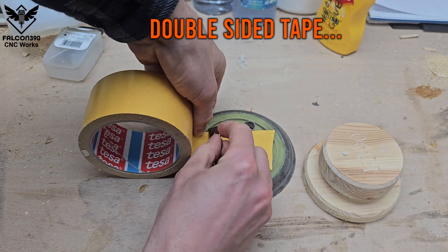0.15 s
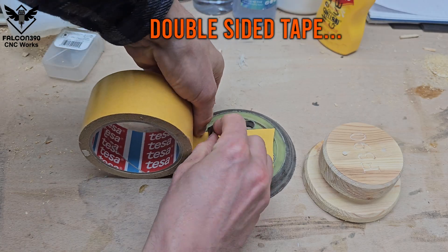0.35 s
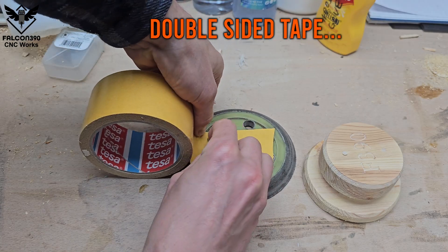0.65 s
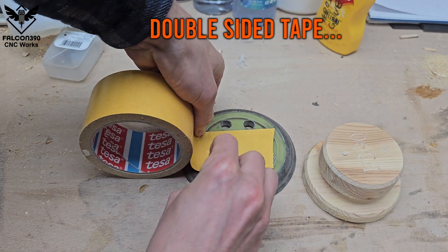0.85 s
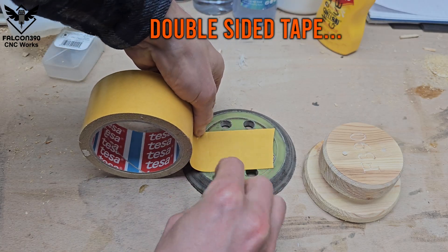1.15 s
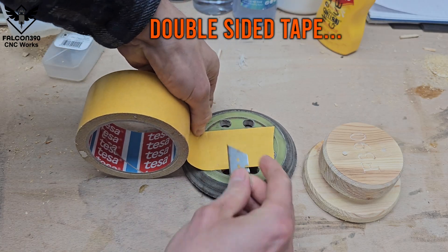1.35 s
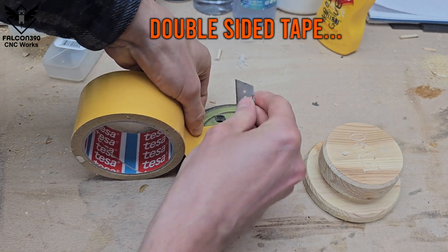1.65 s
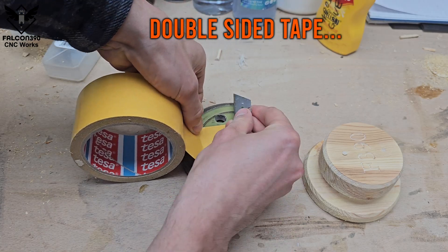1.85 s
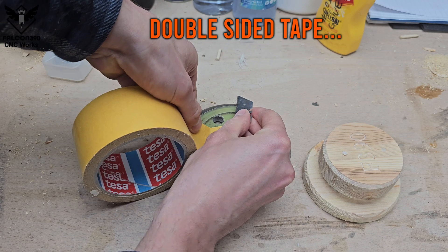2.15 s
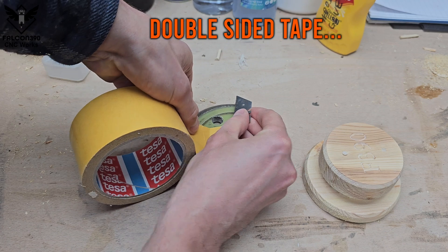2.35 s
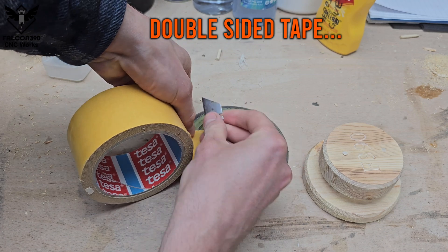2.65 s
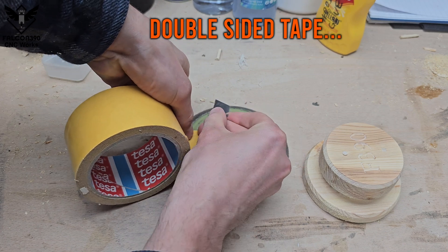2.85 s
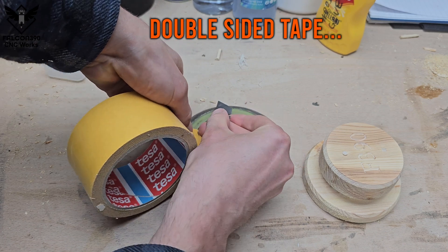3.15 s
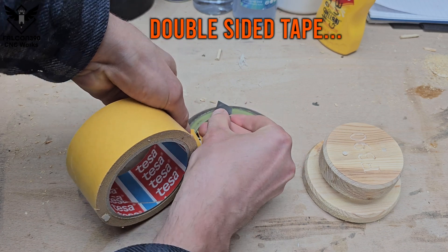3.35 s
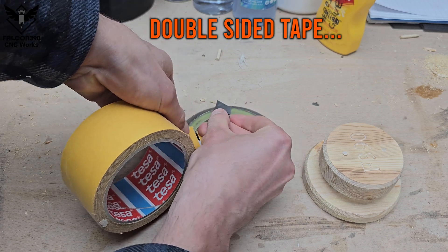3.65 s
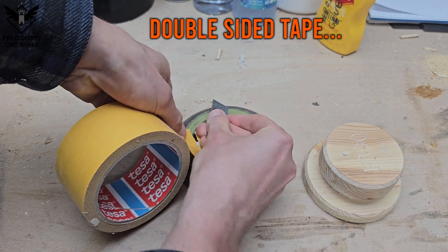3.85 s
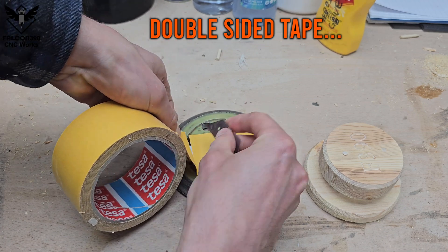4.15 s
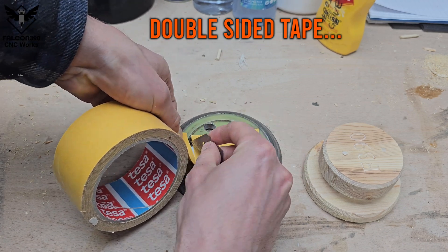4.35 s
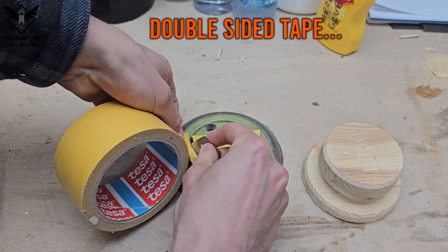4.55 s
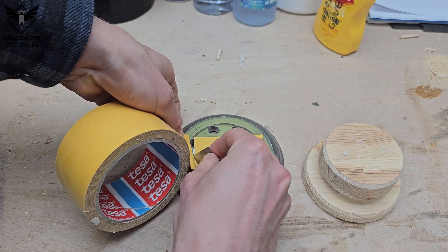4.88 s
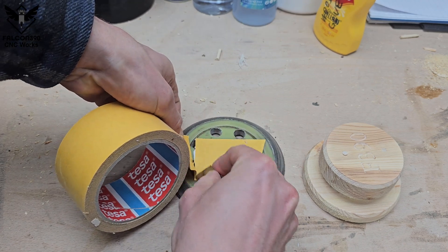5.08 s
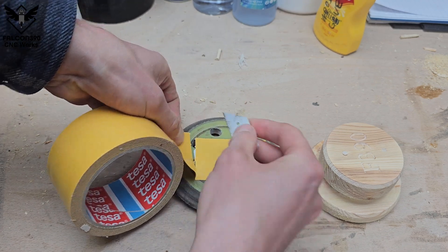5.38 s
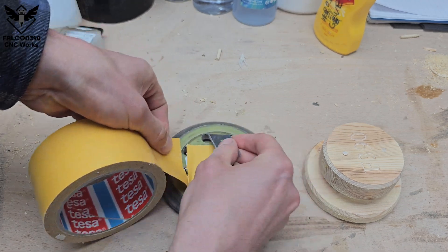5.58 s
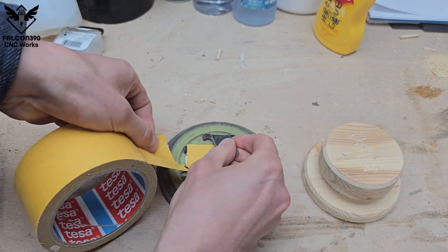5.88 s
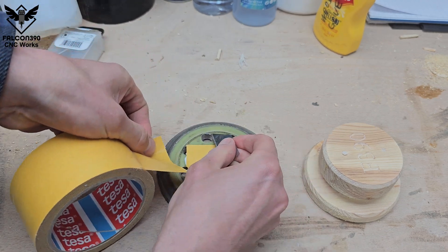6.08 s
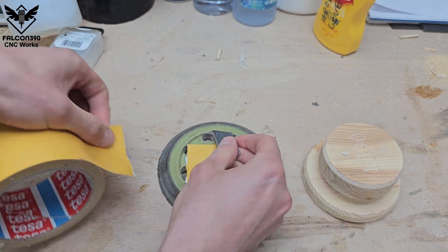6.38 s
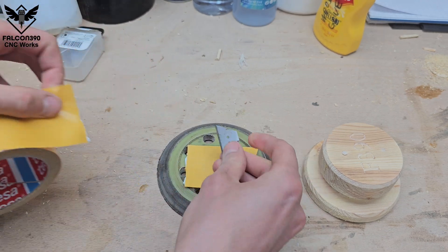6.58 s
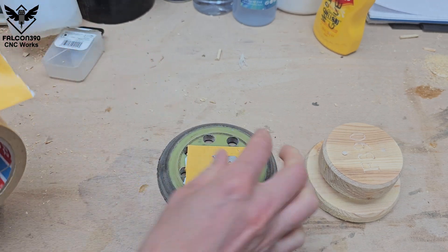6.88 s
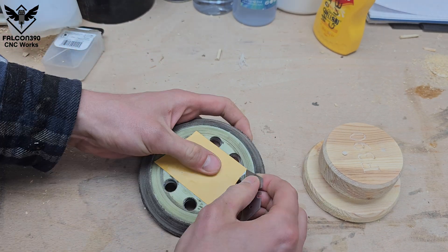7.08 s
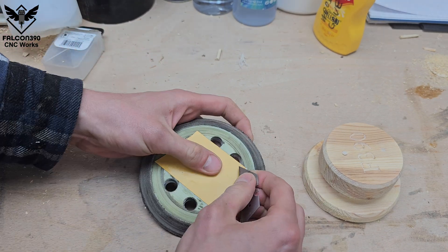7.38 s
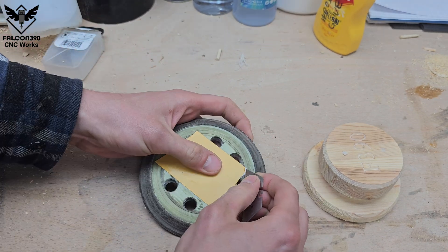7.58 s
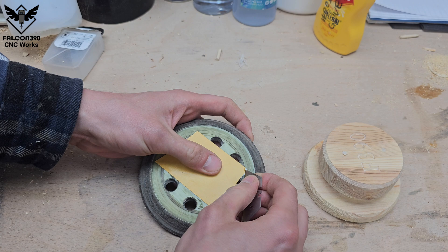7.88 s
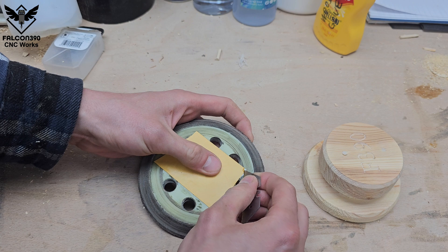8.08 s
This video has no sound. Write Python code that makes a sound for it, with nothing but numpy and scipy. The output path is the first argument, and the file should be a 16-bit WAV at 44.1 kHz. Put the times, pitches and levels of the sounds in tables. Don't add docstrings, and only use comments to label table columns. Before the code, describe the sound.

Sticky tape crackles and rips off its roll in irregular bursts, with sharp snaps, bench knocks and plastic scrapes, then near silence in a quiet workshop.

```python
import sys
import numpy as np
from scipy import signal
from scipy.io import wavfile
from scipy.ndimage import uniform_filter1d

SR = 44100
rng = np.random.default_rng(int(sys.argv[2]) if len(sys.argv) > 2 else 0)


def natural_amplitude(level_db):
    exponent = np.asarray(level_db, float) / 20
    return 10 ** exponent


def bounce(signal):
    frames = np.transpose(np.atleast_2d(signal))
    limited = np.clip(frames, -1, 1)
    pcm = np.round(limited * 32767).astype(np.int16)
    wavfile.write(sys.argv[1], SR, pcm)


N = 362943

# [start t/s, length t/s, crackle level/dB,
# fizz over crackle level/dB, tautness/dB]
HELD_PULLS = [(0.272, 0.0914, -38.5, -9, 0), (0.836, 0.1497, -38.5, -6, -1.5),
              (1.077, 0.1596, -37, -13, 4), (1.502, 0.0887, -39, -7, -4.5), (1.657, 0.118, -37, -9.5, -6),
              (1.886, 0.178, -38, -1, -1.5), (2.527, 0.0755, -42, -0.5, 0), (2.869, 0.0876, -39.5, -5, 2),
              (3.518, 0.052, -43, 0.5, -4.5), (3.575, 0.2085, -41, -3.5, -0.5),
              (3.9, 0.11, -32.5, -5.5, 0), (4.044, 0.1196, -44.5, -8, -1),
              (4.832, 0.07, -43.5, -3.5, -0.5), (4.901, 0.137, -35, -7, 1), (5.049, 0.1714, -35, -7, -1),
              (5.672, 0.068, -46.5, 6.5, -10),
              (.47, 0.1506, -44, -8, -0.5), (.62, 0.1535, -50, -4.5, -6), (1, 0.114, -47, -13, -3),
                  (1.33, 0.2, -50.5, -7, -3), (2.252, 0.058, -51, 5, -19.5), (2.66, 0.22, -63.5, -12, 1),
                  (3.107, 0.012, -44, -8, 2.5), (3.32, 0.149, -58, 1.5, 1.5),
                  (4.2, 0.1225, -53.5, -13.5, -1.5), (4.34, 0.171, -50.5, -23, -0.5),
                  (6.316, 0.102, -49, -6.5, 2), (6.63, 0.0656, -54.5, -2, 4.5),
                  (6.96, 0.067, -66, -4, 12.5)]
# [t/s, crackle level/dB, fizz over crackle level/dB, 20 dB fall t/s]
GLUE_JERKS = [(0, -44, -5.5, 0.0075), (2.019, -30, -15.5, 0.2208), (2.055, -28.5, -8, 0.1251),
              (2.43, -50.5, -12.5, 1.04), (3.93, -23.5, -4, 0.0028), (4.002, -29.5, -10.5, 0.0012),
              (5.541, -31.5, -11.5, 0.0956), (5.603, -34, -6, 0.1312), (5.655, -28.5, -9, 0.0674),
              (5.893, -23, -6.5, 0.0436), (5.957, -21, -6, 0.0467), (6.307, -44.5, -7, 0.0934),
              (6.857, -37.5, -13, 0.0749), (6.932, -43, -22.5, 0.086), (7.966, -71.5, -5.5, 0.37)]
# [t/s, crackle level/dB, fizz over crackle level/dB, 20 dB fall t/s]
SWELLING_TUGS = [(.126, -45.5, -7, 0.0777), (0.918, -32.5, -18, 0.0333), (1.235, -29.5, -21, 0.0207),
                 (1.822, -29, -16, 0.065), (4.494, -46.5, -11, 0.109), (4.797, -32.5, -9, 0.0465),
                 (5.338, -57.5, -6, 0.079), (5.462, -41, -12.5, 0.0586), (5.807, -36, -3, 0.0755),
                 (5.86, -49, 5.5, 0.18), (6.157, -51.5, -8.5, 0.139), (6.584, -38, -4, 0.0538),
                 (7.341, -61.5, -2, 0.0769)]
# [f/Hz, level per Hz/dB]
PAD_COLOUR = [(950, -16), (1400, -15), (1650, -9), (1900, -2), (2200, -6), (2650, -5), (3100, -11),
              (3700, -13)]
# [f/Hz, level per Hz/dB]
FILM_COLOUR = [(2900, -14), (3350, -3), (3800, -4), (4300, -1), (5000, -1), (5600, -5), (6600, -13)]
# [f/Hz, level per Hz/dB]
FIZZ_COLOUR = [(2940, -33), (5000, -7.5), (6420, -12.5), (7920, -10.5), (15000, -27.5), (16000, -28.5),
               (16500, -50.5)]
# [t/s, peak level/dB, ring f/Hz, top level/dB]
BRIGHT_SNAPS = [(0.5829, -17.5, 1933, -5), (0.9135, -17.5, 1850, -16.5), (1.4518, -23.5, 1959, -12),
                (1.493, -24.5, 2000, -7.5), (1.7763, -14, 1983, -26.5), (2.0129, 6.5, 1945, -15.5),
                (2.1034, -15, 2000, 2), (2.4227, -25.5, 2580, -1.5), (2.9289, -12.5, 2159, -16),
                (3.5064, -14.5, 2238, -7), (3.7746, -15.5, 4600, -16), (5.002, -13.5, 4950, -13),
                (5.0744, -11, 2690, -3), (5.549, -15.5, 1265, 2.5), (5.647, -4, 1941, -2),
                (5.8564, -22, 1910, 1), (5.881, 0, 2084, -16.5), (5.9472, -2, 2016, -7.5),
                (6.3043, -5.5, 4010, -13), (7.3018, -51.5, 3460, 10)]
# [t/s, peak level/dB, ring f/Hz]
DULL_PAD_SNAPS = [(0.2653, -14.5, 2159), (1.4227, -21.5, 2466), (1.6606, -18, 1857), (1.7625, -18, 1930),
                  (1.8112, 2, 2112), (2.0472, 4, 2103), (2.8581, -5.5, 2043), (3.054, -33, 2150),
                  (3.2032, -36.5, 1950), (3.274, -19.5, 2376), (3.3099, -10, 2059), (3.6156, -12.5, 1169),
                  (3.716, -11.5, 1942), (3.8859, -9, 1986), (4.4312, -24, 2056), (5.3661, -30.5, 2140),
                  (5.5227, -14.5, 2480), (5.7322, -20.5, 1753), (6.9197, -22.5, 2400), (7.958, -51.5, 2690)]
# [t/s, peak level/dB, ring f/Hz]
DULL_FILM_SNAPS = [(0.4696, -28, 2810), (0.5089, -20.5, 2730), (1.1745, -16, 4300), (1.1797, -9.5, 4280),
                   (1.1972, -16.5, 4550), (1.2076, -17, 4730), (1.2273, -15, 4100), (1.2367, -10, 4450),
                   (1.923, -20, 4700), (3.5768, -13, 4710), (3.7494, -17, 5000), (4.0683, -18.5, 4570),
                   (4.7467, -25.5, 4860), (4.791, -14, 2973), (4.9297, -21.5, 4600), (5.1901, -10, 4610),
                   (5.7752, -21.5, 4460), (6.1407, -25.5, 4210), (6.1678, -21.5, 4900), (6.6998, -27, 4493),
                   (6.8399, -25, 3410), (7.333, -40.5, 3410)]
# [t/s, peak level/dB, hollow part level/dB, t60 t/s]
BENCH_KNOCKS = [(1.805, -36, 26.5, 0.067), (2.012, -6, -18, 0.071), (2.047, -13.5, -15, 0.061),
                (3.613, -34, -20.5, 0.07), (5.074, -22.5, -5.5, 0.041), (5.189, -21.5, -33, 0.042),
                (5.645, -34, -12.5, 0.36), (5.881, -6.5, -30, 0.17), (5.946, -17.5, -23, 0.15),
                (6.303, -28, 1.5, .04), (6.918, -33.5, -17, 0.097)]
# [f/Hz, level/dB, t60 t/s]
BENCH_MODES = [(118, 2.5, 0.12), (197.92, -2.5, .1), (268, -0.5, 0.11), (388.54, 4.5, 0.084),
               (590.5, -4, .06), (745, 0.5, 0.046), (820, -5, 0.029), (1032.4, -8.5, 0.16)]
# [start t/s, length t/s, bench rumble level/dB, scrape level/dB]
PAD_SLIDES = [(0.34, 0.154, -64.5, -65.5), (0.621, 0.205, -57, -51), (0.852, 0.3912, -48, -42),
              (1.719, 0.095, -41, -42.5), (1.907, 0.12, -51, -41), (2.201, 0.1366, -59, -52.5),
              (2.856, 0.14, -57.5, -44.5), (3.391, 0.145, -55, -85.5), (3.906, 0.074, -46.5, -33.5),
              (4.337, 0.16, -59.5, -58.5), (4.782, .43, -49, -38.5), (5.368, 0.126, -52.5, -59),
              (6.37, 0.0806, -66.5, -54)]
# [t/s, rumble level/dB, scrape level/dB, 20 dB rise t/s, 20 dB fall t/s]
HAND_BUMPS = [(0, -23.5, -34.5, .02, 0.0604), (.13, -53, -42.5, 0.083, 0.0377),
              (.279, -50.5, -40.5, 0.045, 0.6), (.547, -38, -41.5, 0.13, 0.232),
              (1.542, -42, -40.5, 0.146, 0.141), (1.676, -34.5, -37, 0.048, 0.111),
              (1.812, -18.5, -32.5, 0.0347, 0.06), (2.021, -15, -7.5, 0.0052, 0.073),
              (2.59, -38.5, -34.5, 0.0883, 0.0957), (2.801, -31.5, -42, 0.0234, 0.038),
              (3.011, -47, -43, 0.064, 0.063), (3.624, -44.5, -42, 0.125, 0.135),
              (3.989, -37, -31.5, 0.124, 0.175), (4.488, -29.5, -38.5, 0.0336, 0.0452),
              (5.534, -24, -34.5, 0.023, 0.0626), (5.664, -34.5, -33, 0.139, 0.1095),
              (5.888, -18, -15, 0.0069, 0.0914), (6.314, -21.5, -46.5, 0.0142, 0.056),
              (6.598, -44, -42, 0.0484, 0.0635), (6.852, -37, -44, 0.0117, 0.0546),
              (6.931, -25.5, -36, 0.0157, 0.042), (7.354, -57.5, -66, 0.17, 0.13)]
# [f/Hz, level per Hz/dB]
SCRAPE_COLOUR = [(88, -43), (150, -6), (292, -2), (595, -6), (918, -8.5), (1500, -17), (1950, -49),
                 (3300, -120)]
# [f/Hz, level per Hz/dB]
RUMBLE_COLOUR = [(20, -29.5), (45, -4), (81, -2), (108, 7.5), (163, -15.5), (220, -5), (290, -27.5),
                 (480, -120)]
# [f/Hz, level/dB, t60 t/s]
BLADE_MODES = [(1220, -33, 0.106), (11100, -74, .15), (11700, -72, 0.13), (14900, -65, 0.226)]
# [start t/s, length t/s, f/Hz, level/dB]
FILM_SQUEAKS = [
    (7.97, .22, 2750, -78.5),
    (8.13, .07, 4050, -90.5),
]
# [start t/s, length t/s, f/Hz, level/dB]
BIRD_NOTES = [
    (6.76, .06, 2110, -80.5),
    (7.09, .05, 1875, -83.5),
    (7.225, .03, 1915, -77.5),
    (7.335, .04, 2106, -68.5),
    (7.4, .05, 2235, -85.5),
    (7.74, .05, 1580, -90.5),
    (7.87, .03, 1705, -89.5),
]
# [f/Hz, level per Hz/dB]
HUSH_COLOUR = [(25, -24), (38, -3), (60, 2), (76, -10), (197, -24), (1300, -40), (7300, -46), (16500, -43)]
# [f/Hz, t60 t/s]
SHOP_DECAY = [(100, 0.044), (1000, 0.1), (4000, 0.057), (15000, .08)]

PULL_RISE_S, PULL_FADE_S = 0.025, 0.061
JERK_RISE_S, TUG_RISE_SHARE = 0.018, 1
LOOSE_DB = -1
STILL_DB = -99.5
SLIDE_RISE_S, SLIDE_FADE_S = 0.042, 0.073
REST_RUMBLE_DB, REST_SCRAPE_DB = -76.5, -88.5
BUSY_DB, BUSY_END_S = -67.5, 7.07
DULL_TOP_DB, BLADE_S, HUSH_DB = -28.5, 6.92, -72


def crackle():
    slack, taut, bright = peeling()
    clicks = steady(glue(per_s=3700, spread_db=3.5, clump_db=6.5), span=7800)
    hiss_share = np.clip(np.hypot(slack, taut) / natural_amplitude(-40), 0.55, 1.2)
    clicks = clicks + hiss_share * rng.standard_normal(N)
    pad, film, fizz = clicks * rng.choice([-1., 1.], (3, N))
    pad = steady(colour(drift(pad, depth_db=3), PAD_COLOUR), span=3000)
    film = steady(colour(drift(film, depth_db=3), FILM_COLOUR), span=3000)
    fizz = steady(colour(drift(fizz, depth_db=1.5), FIZZ_COLOUR), span=3000)
    return natural_amplitude(-1) * (slack * pad + taut * film) + natural_amplitude(-2.36) * bright * fizz


def peeling():
    held = np.transpose(HELD_PULLS)
    jerk, tug = np.transpose(GLUE_JERKS), np.transpose(SWELLING_TUGS)
    shapes = np.hstack([strokes(held[0], held[1], PULL_RISE_S, PULL_FADE_S),
                        strokes(jerk[0], 0, JERK_RISE_S, jerk[3]),
                        strokes(tug[0], 0, TUG_RISE_SHARE * tug[3], tug[3])])
    crackle_db = np.r_[held[2], jerk[1], tug[1]]
    fizz_db = np.r_[held[3], jerk[2], tug[2]]
    tautness = natural_amplitude(np.r_[held[4], LOOSE_DB + 0 * jerk[0], LOOSE_DB + 0 * tug[0]])
    taut_db = -10 * np.log10(1 + tautness ** -4)
    slack_db = -10 * np.log10(1 + tautness ** 4)
    gains = []
    for part_db, busy_share in ((slack_db, 0.6), (taut_db, 0.8), (fizz_db, 0.4)):
        peel = total(shapes, crackle_db + part_db, STILL_DB)
        gains.append(np.hypot(peel, busy_share * busy()))
    return gains


def glue(per_s, spread_db, clump_db):
    clumps = evened(uniform_filter1d(uniform_filter1d(rng.standard_normal(N), 150), 150))
    size = natural_amplitude(spread_db * np.minimum(rng.exponential(1, N), 6) + clump_db * clumps)
    parting = rng.random(N) < per_s / SR
    return size * parting * rng.standard_normal(N)


def drift(x, depth_db):
    z = signal.stft(x, nperseg=512)[2]
    patches = rng.standard_normal(z.shape[::-1]).T
    for _ in range(2):
        patches = uniform_filter1d(uniform_filter1d(patches, size=7, axis=0), size=14, axis=1)
    return signal.istft(z * natural_amplitude(depth_db * evened(patches)), nperseg=512)[1][:len(x)]


def snap(db, hz, top_db, chance):
    t = np.arange(len(chance)) / SR
    burst = np.sin(np.pi * np.minimum(t * hz / 4, 1)) * np.sin(2 * np.pi * hz * t)
    crack = 0.6 * chance * natural_amplitude(-60 * t / 0.0078)
    crack[round(SR / hz)] += 1.8
    wake = ring(chance, hz, 1500) * natural_amplitude(-60 * t / 0.059) * np.minimum(t / 0.0042, 1)
    tick = ring(crack, 4500, 3100)
    top = natural_amplitude(top_db + 1.5) * ring(crack, 6800, 11000)
    sound = 0.49 * burst + 1.03 * tick + 0.39 * wake + top
    return natural_amplitude(db) * signal.lfilter(*signal.butter(N=2, Wn=900, btype="high", fs=SR), sound)


def knock(db, hollow_db, t60, chance):
    t = np.arange(len(chance)) / SR
    blow = chance * natural_amplitude(-60 * t / np.clip(t60, 0.04, 0.3)) * np.minimum(t / 0.0027, 1)
    shifts = 1 + 0.03 * chance[-len(BENCH_MODES):]
    sound = 0
    for (hz, mode_db, mode_t60), shift in zip(BENCH_MODES, shifts):
        gain = natural_amplitude(mode_db + (hollow_db if hz < 180 else 0)) * np.sqrt(mode_t60)
        sound = sound + gain * ring(blow, hz * shift, 2.7 / np.clip(mode_t60, 0.02, 0.12))
    high = signal.lfilter(*signal.butter(N=2, Wn=180, btype="high", fs=SR), sound)
    return natural_amplitude(db) * sound / abs(high).max()


def handling():
    scrape = steady(colour(glue(per_s=1000, spread_db=-0.5, clump_db=-1), SCRAPE_COLOUR))
    rumble = steady(colour(glue(per_s=130, spread_db=4.5, clump_db=3), RUMBLE_COLOUR), span=2500)
    slide, bump = np.transpose(PAD_SLIDES), np.transpose(HAND_BUMPS)
    shapes = np.hstack([strokes(slide[0], slide[1], SLIDE_RISE_S, SLIDE_FADE_S),
                        strokes(bump[0], 0, bump[3], bump[4])])
    scrape_gain = natural_amplitude(-5.5) * total(shapes, np.r_[slide[3], bump[2]], REST_SCRAPE_DB)
    rumble_gain = natural_amplitude(-1) * total(shapes, np.r_[slide[2], bump[1]], REST_RUMBLE_DB)
    restless = 0.26 * busy() * (scrape + 3.6 * rumble)
    return scrape_gain * scrape + restless + rumble_gain * rumble


def busy():
    return natural_amplitude(BUSY_DB) * (np.arange(N) < BUSY_END_S * SR)


def blade():
    t = np.arange(SR // 4) / SR
    sound = 0
    for hz, db, t60 in BLADE_MODES:
        chatter = evened(ring(rng.standard_normal(len(t)), hz, 56))
        sound = sound + natural_amplitude(db - 60 * t / t60) * chatter
    return sound


def whistles():
    start, length, hz, db = np.transpose(BIRD_NOTES + FILM_SQUEAKS)
    birds = len(BIRD_NOTES)
    waver = np.cumsum(rng.standard_normal(N)) / 30
    notes = [np.sqrt(2) * np.sin(2 * np.pi * f * np.arange(N) / SR + waver) for f in hz[:birds]]
    notes += [evened(ring(ring(rng.standard_normal(N), f, 160), f, 160)) for f in hz[birds:]]
    shapes = strokes(start, length, 0.041, 0.0397)
    return sum(total(shapes[:, [k]], db[[k]], -150) * note for k, note in enumerate(notes))


def hush():
    return natural_amplitude(HUSH_DB) * evened(colour(rng.standard_normal(N), HUSH_COLOUR))


def shop(x):
    taps = np.zeros(SR // 2)
    at = np.arange(120, SR // 2 - 20, 20)
    at = at + rng.integers(0, 20, len(at))
    taps[at] = rng.choice([-1., 1.], at.shape)
    hz, t, z = signal.stft(taps, SR, nperseg=256)
    decay = natural_amplitude(-60 * t / read(SHOP_DECAY, hz)[:, None])
    tail = signal.istft(z * decay, SR, nperseg=256)[1]
    return signal.fftconvolve(x, tail / np.linalg.norm(tail))[:N]


def strokes(start, length, rise, fall):
    t = np.arange(N * 1000 // SR + 2)[:, None] / 1000
    before = np.maximum(start - t, 0) / rise
    after = np.maximum(t - start - length, 0) / fall
    return natural_amplitude(-40 * (before + after))


def total(shapes, db, rest_db):
    power = shapes @ natural_amplitude(2 * db) + natural_amplitude(2 * rest_db)
    return np.interp(np.arange(N) * 1000 / SR, np.arange(len(power)), np.sqrt(power))


def ring(x, hz, width):
    r = np.exp(-np.pi * width / SR)
    angle = 2 * np.pi * hz / SR
    return signal.lfilter([1 - r * r], [1, -2 * r * np.cos(angle), r * r], x) * np.sin(angle)


def colour(x, points):
    hz = abs(np.fft.fftfreq(16384, 1 / SR))
    skirted = [(points[0][0] / 3, -90)] + points + [(points[-1][0] * 1.4, -90)]
    log_gain = np.log(natural_amplitude(read(skirted, hz)))
    taps = np.fft.ifft(np.exp(np.conj(signal.hilbert(log_gain)))).real[:6000]
    return signal.oaconvolve(x, taps)[:len(x)]


def read(points, hz):
    f, value = np.transpose(points)
    return np.interp(np.log(hz + 1), np.log(f + 1), value)


def steady(x, span=4000):
    return x / np.sqrt(abs(uniform_filter1d(x ** 2, int(span))) + 1e-12)


def evened(x):
    return x / np.sqrt(np.mean(x ** 2) + 1e-20)


def add(mix, s, sound):
    part = mix[max(round(s * SR), 0):][:len(sound)]
    part += sound[:len(part)]


def scene():
    hits = np.zeros(N)
    snaps = BRIGHT_SNAPS + [(*row, DULL_TOP_DB) for row in DULL_PAD_SNAPS + DULL_FILM_SNAPS]
    for s, *settings in snaps:
        add(hits, s + 1 / 1200, snap(*settings, rng.standard_normal(2500)))
    for s, *settings in BENCH_KNOCKS:
        add(hits, s, knock(*settings, rng.standard_normal(9000)))
    add(hits, BLADE_S, blade())
    beds = crackle() + handling() + whistles() + hush()
    return (hits + natural_amplitude(-10.5) * shop(hits) + beds)[None]


def low_pass(x):
    return signal.sosfilt(signal.butter(12, 16660, fs=SR, output="sos"), x)


def record(dry):
    limited = np.tanh(dry / 1.162) * 1.2337
    bass_cut = signal.butter(N=3, Wn=50, btype="high", fs=SR, output="sos")
    treble_cut = signal.firwin(255, 15850, window=("kaiser", 6), fs=SR)
    mix = signal.oaconvolve(signal.sosfilt(bass_cut, limited), treble_cut[None], "same")
    return low_pass(mix)


dry = scene()
out = record(dry)
bounce(out)
```